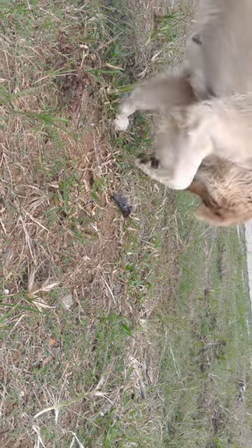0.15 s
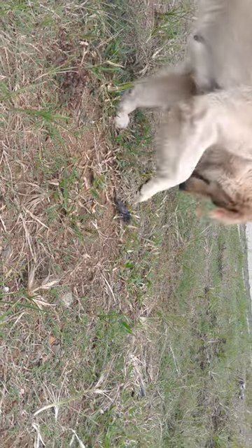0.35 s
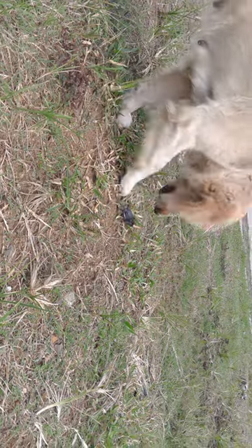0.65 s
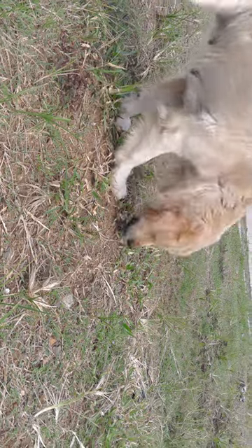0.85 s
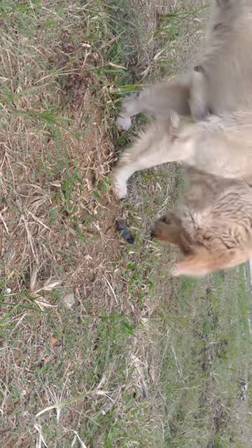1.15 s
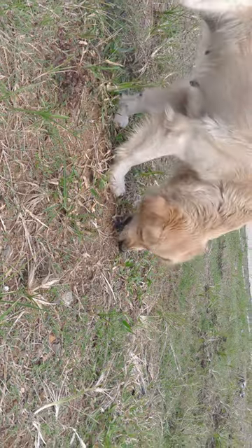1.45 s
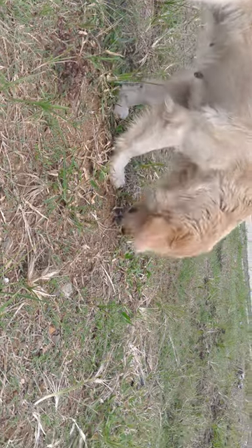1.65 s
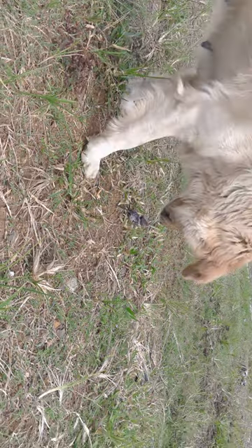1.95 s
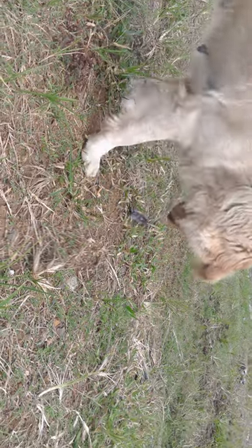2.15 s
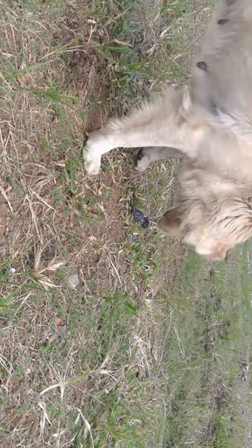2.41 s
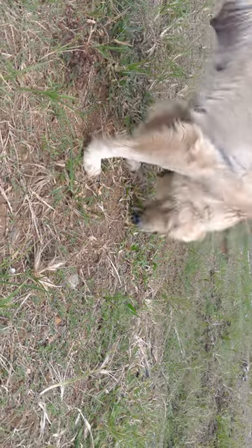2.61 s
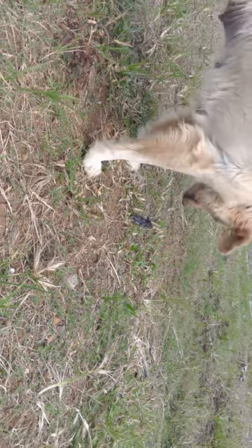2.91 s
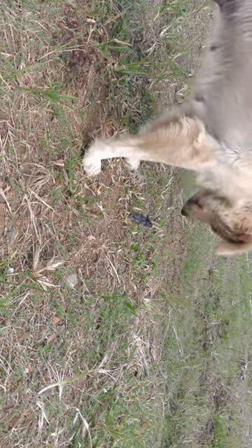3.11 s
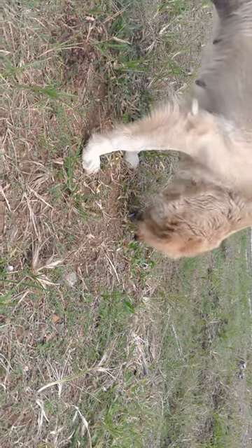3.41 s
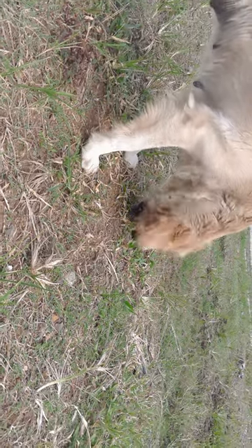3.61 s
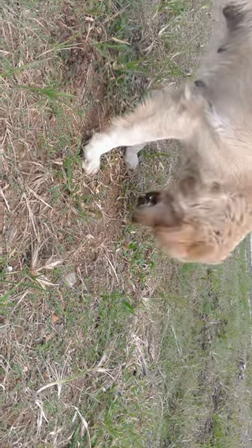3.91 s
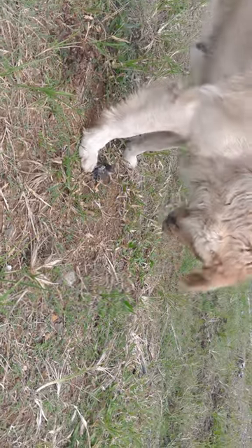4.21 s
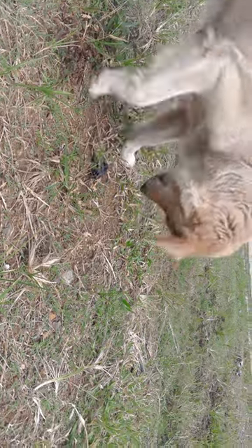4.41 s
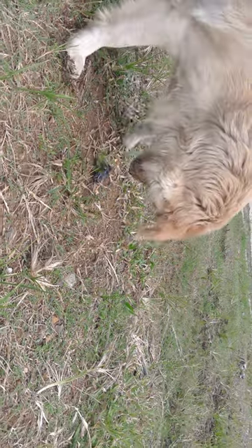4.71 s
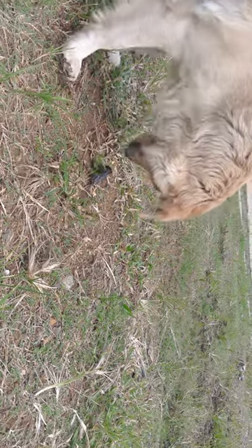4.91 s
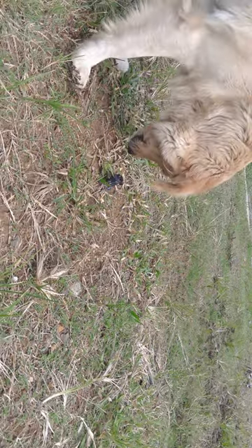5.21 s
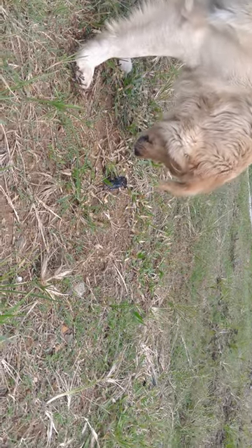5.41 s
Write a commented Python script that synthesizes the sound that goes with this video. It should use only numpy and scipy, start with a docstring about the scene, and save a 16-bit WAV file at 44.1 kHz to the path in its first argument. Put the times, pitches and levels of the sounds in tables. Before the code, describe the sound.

A dog noses a small squeaking rodent in dry grass, its jaws clacking four times, while wind and far traffic rumble softly.

```python
"""Wind and far traffic rumble over an open field while a dog's paws and muzzle stir dry grass, whose stalks tick.
A small rodent then squeaks: near-sine whistles jump in pitch and split into a rougher second tone, with faint gasps.
The dog's jaws snap four times, each a cluster of tooth contacts ringing damped modes, then a rising mouth-cavity ring.
Wind, traffic and rustle are shaped noise; stalks are damped swings with splinters. A phone picks all of it up."""
import sys
import numpy as np
from scipy import signal
from scipy.fft import rfft, irfft
from scipy.io import wavfile
from scipy.ndimage import uniform_filter1d

SR = 44100
rng = np.random.default_rng(int(sys.argv[2]) if len(sys.argv) > 2 else 0)


def voltage_ratio(level):
    """Linear amplitude factor for a level in decibels (scalar or array-like)."""
    return 10 ** (np.asarray(level, float) / 20)


def bounce(signal):
    """Save signal as a 16-bit WAV file at the path given by the first command-line argument."""
    frames = np.transpose(np.atleast_2d(signal))
    limited = np.clip(frames, -1, 1)
    pcm = np.round(limited * 32767).astype(np.int16)
    wavfile.write(sys.argv[1], SR, pcm)


N = 244749


def unit(x):
    """Normalise signal power: scale to an rms of 1."""
    return x / np.sqrt(np.mean(x ** 2))


def curve(rows):
    """Piecewise-linear envelope: join (time [s], value) rows by straight lines."""
    return np.interp(np.arange(N) / SR, *np.transpose(rows))


def colour(x, points):
    """Linear filtering: weight the spectrum by (frequency [Hz], gain [dB]) points, then set rms to 1."""
    hz, db = np.transpose(points)
    f = np.arange(N // 2 + 1) * SR / N + 1
    gain_db = np.interp(np.log(f), np.log(hz), db)
    return unit(irfft(rfft(x) * voltage_ratio(gain_db), N))


def walk(rate):
    """Band-limited random modulation: levels held 1 / rate s and slewed twice, with a spread near 1."""
    hold = int(SR / rate)
    steps = np.repeat(rng.standard_normal(N // hold + 1), hold)
    return 1.75 * uniform_filter1d(uniform_filter1d(steps, hold), hold)[:N]


def add(out, s, x):
    """Superposition: mix x in at time s."""
    i = int(s * SR)
    out[i:i + len(x)] += x[:N - i]


def field():
    """Broadband noise in independently drifting bands for wind and traffic, with resonant engine drones."""
    # long-term noise spectrum: (frequency [Hz], relative density [dB])
    noise_shape = [(15, -4), (30, 1.4), (55, 1.4), (85, -0.5), (140, -1), (200, -5), (310, -11.5),
                   (400, -15.5), (500, -24.5), (800, -29), (1000, -28.5), (2000, -30.5), (3000, -31),
                   (5000, -36), (8000, -43.5)]
    # wind and traffic below 950 Hz: (time [s], gain [dB])
    rumble_gain = [(0, -47.5), (.45, -49), (1.5, -49.5), (3, -48), (5.55, -51.5)]
    # wind buffeting the microphone, below the traffic: (time [s], change [dB])
    gust_gain = [(0, 1), (.4, 7), (1, 1), (1.7, 2.5), (2.1, -3), (2.4, 3), (3, -2.5), (5.55, 1)]
    spectrum = rfft(colour(rng.standard_normal(N), noise_shape))
    f = np.arange(N // 2 + 1) * SR / N

    def band(lo_hz, hi_hz):
        """Spectral windowing: keep one frequency band of the noise."""
        return irfft(spectrum * (f >= lo_hz) * (f < hi_hz), N)

    def narrow(hz, q):
        """Resonance: noise through a sharp peak becomes an unsteady hum."""
        return unit(signal.lfilter(*signal.iirpeak(hz, q, fs=SR), rng.standard_normal(N)))

    rumble = band(0, 90) * voltage_ratio(curve(gust_gain))
    rumble += band(90, 430) * voltage_ratio(0.5 * walk(4.7))
    rumble += band(430, 950) * voltage_ratio(1.2 * walk(7.4))
    # main drone: (time [s], level [dB])
    drone_level = [(0, -55.5), (.5, -52.5), (1.2, -49.5), (2.2, -68.5), (5.55, -61)]
    drone = narrow(157.0, 33) * voltage_ratio(curve(drone_level))
    # fainter engine notes that come and go on the wind, weaker the higher they are
    for hz in (297.2, 366, 415.3, 537, 676.0, 791):
        drone += narrow(hz, 21) * voltage_ratio(-70.5 - 7.2 * np.log2(hz / 300) + 3.3 * walk(6))
    hiss = band(950, SR) * voltage_ratio(-50.5 + walk(4.14))
    return rumble * voltage_ratio(curve(rumble_gain)) + drone + hiss


def stirring():
    """Power summation of independent sources: every move swells and fades over the breeze."""
    # paws and muzzle in the grass; swell and fade each span 20 dB:
    # (loudest time [s], swell [s], fade [s], level [dB])
    moves = [(0, .1, 0.072, -50.5), (.17, 0.1258, 0.227, -68), (0.301, 0.37, 0.047, -50.5),
             (.477, .1, 0.11, -63), (0.945, 0.049, .02, -49), (1.04, 0.17, 0.73, -62),
             (1.835, .03, 0.21, -50.5), (1.878, 0.0702, 0.01693, -68), (1.99, 0.054, 0.964, -54),
             (2.153, 0.028, 0.044, -47), (2.09, 0.09, 0.089, -54), (2.49, 0.1, .5, -67.5),
             (2.723, 0.02597, 0.016, -43.5), (2.763, 0.018, 0.029, -56.5), (2.89, 0.22, 0.2226, -57),
             (4.159, 0.25, 0.24, -60.5), (4.354, .1, 0.093, -60), (4.615, 0.088, 0.031, -53),
             (4.739, .3, 0.088, -62), (4.937, 0.18, 0.16, -57.5), (5.077, 0.018, 0.1749, -53.5),
             (5.19, 0.092, 1, -60), (5.418, 0.32, 0.1003, -61)]
    breeze_db = -71.5  # the grass never falls quite still
    t = np.arange(N) / SR
    power = voltage_ratio(breeze_db) ** 2
    for s, swell, fade, db in moves:
        distance = np.where(t < s, (s - t) / swell, (t - s) / fade)
        power = power + voltage_ratio(db - 20 * distance) ** 2
    return np.sqrt(power)


def grass():
    """Shot noise: dense tiny stalk contacts of uneven size over a hiss, in quick bursts."""
    # spectrum of the rustle: (frequency [Hz], relative density [dB])
    rustle_shape = [(700, -25), (1500, -10), (2800, -16.5), (3800, -7), (5000, -0.4), (6000, -4),
                    (7000, -2.5), (8000, -14.5)]
    contacts_per_s = 2500
    size_db = 3 * np.minimum(rng.exponential(size=N), 3.5)
    hits = (rng.random(N) < contacts_per_s / SR) * voltage_ratio(size_db) * rng.standard_normal(N)
    rub = colour(unit(hits) + 0.99 * rng.standard_normal(N), rustle_shape)
    return rub * stirring() * voltage_ratio(1.4 * walk(80))


def stalks():
    """Damped oscillation: a stalk swings briefly with splinters; bright ones swing a few cycles more."""
    # single stalks that break or flick; gain scales all three parts: (time [s], gain [dB], swing frequency [Hz])
    ticks = [(0.1004, -50.5, 1205), (0.3047, -40, 6190), (0.354, -48, 6600), (0.472, -49.5, 5353),
             (0.8275, -52, 6110), (0.838, -53.5, 6130), (0.909, -49.5, 1120), (1.0215, -34, 7520),
             (1.043, -40.5, 1440), (2.0444, -40, 6500), (2.099, -37, 1370), (2.1472, -35.5, 5050),
             (2.1748, -43.5, 1080), (2.7205, -51, 5100), (2.888, -52, 6300), (3.1206, -56, 6825),
             (3.1303, -55, 6500), (4.068, -49.5, 4600), (4.0887, -45, 5080), (4.1207, -46, 4710),
             (4.1208, -54, 920), (4.1658, -48.5, 4100), (4.259, -50, 4830), (4.2594, -44.5, 670),
             (5.1021, -51, 4970), (5.345, -54, 6700)]
    out, t = np.zeros(N), np.arange(int(0.027 * SR)) / SR
    for s, gain_db, hz in ticks:
        grit = rng.standard_normal(len(t))
        decay_cycles = 0.34 + hz / 1500
        swing = np.sin(2 * np.pi * hz * t) * np.exp(-t * hz / decay_cycles)
        band = signal.butter(2, [hz / 1.17, hz], "band", fs=SR, output="sos")
        splinters = unit(signal.sosfilt(band, grit)) * np.exp(-t / 0.0021)
        # the break itself is a broad, instant crack
        crack = voltage_ratio(-2.0) * grit * np.exp(-t / 0.00029)
        add(out, s, voltage_ratio(gain_db) * (1.85 * swing + voltage_ratio(-2.5) * splinters + crack))
    return out


def whistles(tables, waver, flutter_db, octave_db, rasp_db, rasp_hz, edge_s):
    """Frequency and amplitude modulation: trembling near-sines with an octave and a haze of turbulent breath."""
    out = np.zeros(N)
    pitch = 1 + waver * walk(350)
    strength = voltage_ratio(flutter_db * walk(250))
    lowpass = signal.butter(2, rasp_hz, fs=SR, output="sos")
    breath = voltage_ratio(rasp_db) * unit(signal.sosfilt(lowpass, rng.standard_normal(N)))
    for rows in tables:  # each row: (time [s], frequency [Hz], level [dB])
        s, hz, db = np.transpose(rows)
        i = np.arange(int((s[0] - edge_s) * SR), int((s[-1] + edge_s) * SR))
        t = i / SR
        phase = 2 * np.pi * np.cumsum(np.interp(t, s, hz) * pitch[i]) / SR
        edges = np.clip(np.minimum(t - t[0], t[-1] - t) / (2 * edge_s), 0, 1)
        tone = (1 + breath[i]) * np.sin(phase) + voltage_ratio(octave_db) * np.sin(2 * phase)
        # sqrt(2) turns an rms level into a sine's peak
        out[i] += np.sqrt(2) * voltage_ratio(np.interp(t, s, db)) * edges * strength[i] * tone
    return out


def call(db, change_db, contour):
    """Driven oscillator: a push, a steady drift, more effort on high notes and a dying end."""
    push_s, push_db = 0.0036, 0.5
    dying_s, dying_db = 0.006425, -10.5
    effort_db_per_khz = 3.5  # louder where it is pushed higher
    s0, s1 = contour[0][0], contour[-1][0]
    s = np.linspace(s0, s1, num=200)
    hz = np.interp(s, *np.transpose(contour))
    level = db + change_db * (s - s0) / (s1 - s0)
    level += effort_db_per_khz * (hz - hz.mean()) / 1000
    level += push_db * np.exp((s0 - s) / push_s)
    level += dying_db * np.exp((s - s1) / dying_s)
    return np.transpose([s, hz, level])


def flip(s0, s_flip, s1, low_hz, db):
    """Register change: a tone holds low, then steps up to a weaker register."""
    flip_ratio, flip_db, flip_s = 1.07, -6, .0015
    high_hz, high_db = low_hz * flip_ratio, db + flip_db
    end_s = max(s1, s_flip + 2 * flip_s)
    return [(s0, low_hz, db), (s_flip, low_hz, db), (s_flip + flip_s, high_hz, high_db), (end_s, high_hz, high_db)]


def rodent():
    """Superposed voice registers: the clear whistle, the rough tones that split off it, and gasps."""
    # whistles, before push, effort and dying end:
    # (start level [dB], change by the end [dB], contour of (time [s], frequency [Hz]))
    squeaks = [ (-36.5, -8, [(1.128, 4480), (1.133, 4270), (1.172, 4200), (1.212, 4610), (1.214, 4370),
               (1.228, 4350), (1.235, 4670), (1.274, 4520)]), (-37, -3, [(1.631, 4320), (1.653, 4270),
               (1.675, 4460), (1.679, 4290), (1.726, 4350), (1.746, 4620), (1.754, 4500), (1.77, 4670)]),
               (-61.5, 13, [(1.794, 4480), (1.807, 4530), (1.811, 4270), (1.822, 4150)]),
               (-53, 0, [(1.882, 4230), (1.889, 4550), (1.9, 4480)]), (-49, -2, [(2.258, 4430), (2.3, 4375),
               (2.335, 4430), (2.362, 4300), (2.378, 4250)]), (-43, 3, [(2.879, 4000), (2.893, 4050)]),
               (-43, 1, [(2.922, 4000), (2.925, 4340), (2.937, 4380), (2.95, 4110), (2.956, 4540),
               (2.965, 4550), (2.972, 4417)]), (-62, -6, [(3.766, 3850), (3.79, 3870), (3.815, 4100)]),
               (-61, 2, [(3.822, 3960), (3.838, 4100)]), (-52.5, 8.5, [(4.214, 3700), (4.22, 3940),
               (4.238, 4070)]), (-50.5, 2, [(4.903, 3710), (4.935, 3690), (4.946, 3300)]),
               (-82, 1, [(5.458, 3680), (5.485, 3320), (5.53, 3130)]), ]
    # second tone of the strained voice: (start [s], flip [s], end [s], low frequency [Hz], low level [dB])
    split_tones = [(1.131, 1.137, 1.145, 4930, -46), (1.146, 1.156, 1.168, 4900, -45.5),
                   (1.17, 1.186, 1.195, 5030, -51.5), (1.196, 1.2, 1.203, 5000, -54),
                   (1.654, 1.664, 1.668, 4900, -55), (1.681, 1.682, 1.696, 4980, -46),
                   (1.697, 1.704, 1.716, 5080, -50), (1.719, 1.729, 1.742, 4930, -50),
                   (2.893, 2.906, 2.91, 4800, -47), (2.912, 2.92, 2.923, 5000, -45),
                   (2.893, 2.91, 2.921, 3280, -57), (2.946, 2.953, 2.956, 6150, -50)]
    # faint and hoarse, more breath than tone; level is that of the tone:
    # (start [s], end [s], first frequency [Hz], last frequency [Hz], level [dB])
    gasp_rows = [(1.82, 1.884, 5050, 5300, -67), (2.899, 2.922, 4000, 4200, -64),
                 (2.902, 2.923, 5800, 5600, -68), (3.85, 3.94, 3850, 4030, -77),
                 (3.795, 3.865, 5250, 5450, -77), (3.885, 3.94, 4950, 4900, -77),
                 (3.8, 3.9, 2720, 3400, -82), (2.465, 2.51, 5280, 5370, -77)]
    clear = whistles([call(*row) for row in squeaks], waver=0.005, flutter_db=0.7,
                     octave_db=-13.5, rasp_db=-27.5, rasp_hz=1100, edge_s=.001)
    split = whistles([flip(*row) for row in split_tones], waver=0.009, flutter_db=1.5,
                     octave_db=-43, rasp_db=-9, rasp_hz=900, edge_s=0.001)
    glides = [[(s0, hz0, db), (s1, hz1, db)] for s0, s1, hz0, hz1, db in gasp_rows]
    gasps = whistles(glides, waver=0.014, flutter_db=1.0,
                     octave_db=-38, rasp_db=9, rasp_hz=300, edge_s=0.005)
    return clear + split + gasps


def jaws():
    """Modal synthesis: tooth contacts ring shared modes, most those near their brightest, over a crackle."""
    # tooth contacts, in four clusters; ring peak is before the filters below:
    # (time [s], ring peak [dB], brightest frequency [Hz], ring stretch [ratio])
    contacts = [(1.3245, -38, 3500, .5), (1.3285, -36, 2500, .5), (1.3438, -3, 3900, 1.5),
                (1.3441, -12, 1470, 1.3), (1.3444, -7, 6900, 1.5), (1.348, -20, 2080, 0.8),
                (1.496, -2, 2815, 0.65), (1.498, -19.5, 6500, 1.2), (1.5004, -14, 2518, 1.1),
                (1.625, -4.5, 2540, 0.73), (1.6255, -21, 570, 1.3), (1.6282, -17, 6010, 1.0),
                (1.6285, -12, 2800, 1.0), (1.632, -20.5, 2820, 0.79), (1.7707, -1.5, 2550, 1.0),
                (1.7712, -25, 570, 1.3), (1.7724, 0, 3800, 0.75), (1.7749, -3, 5000, 0.6),
                (1.782, -22, 6800, 1.2)]
    # teeth and mouth: (frequency [Hz], relative level [dB], 60 dB decay time before stretch [s])
    modes = [(570, 2, .022), (1480, -1, .016), (2070, -6, .013), (2480, -1, .014), (2750, -1, .02),
             (3180, -4, .016), (3830, -1, .014), (4630, -3, .012), (5430, 1, .015), (5930, -1, .014),
             (6820, 1, .013), (7390, -5, .013)]
    out, t = np.zeros(N), np.arange(int(0.12 * SR)) / SR
    hz, db, t60 = np.transpose(modes)[:, :, None]
    for s, peak_db, bright_hz, stretch in contacts:
        scatter_db, detune = rng.standard_normal((2, len(modes), 1))
        # a long-ringing contact picks out fewer modes
        octaves_away = abs(np.log2(hz / bright_hz))
        gain = voltage_ratio(db - 13 * stretch * octaves_away + scatter_db)
        # the contact itself spikes above the ring
        fade = np.exp(-np.log(1000) * t / (stretch * t60)) + 0.6 * np.exp(-t / 0.001)
        ring = (gain * fade * np.sin(2 * np.pi * hz * (1 + 0.015 * detune) * t)).sum(axis=0)
        ring = ring / abs(ring).max()
        crackle = np.diff(rng.standard_normal(len(t)), prepend=0) * np.exp(-np.log(1000) * t / 0.021)
        add(out, s, voltage_ratio(peak_db) * (ring + voltage_ratio(-16.0 - 4.3 * stretch) * crackle))
    # the snaps sound little around 1 kHz
    out = signal.lfilter(*signal.iirnotch(1030, 2.2, fs=SR), out)
    # the snaps carry no bass
    return signal.sosfilt(signal.butter(2, 380, "high", fs=SR, output="sos"), out)


def mouth():
    """Cavity resonance: the closing mouth rings higher as it shrinks, fading, with wet treble crackle."""
    # rings after the snaps: (start [s], end [s], first frequency [Hz], last frequency [Hz], start level [dB])
    closings = [(1.351, 1.371, 2650, 3150, -29), (1.504, 1.519, 2650, 3050, -38),
                (1.632, 1.646, 2700, 3200, -33), (1.783, 1.795, 3050, 3300, -33)]
    fade_db = -19  # change over each ring
    t = np.arange(N) / SR
    rings, wet = [], np.zeros(N)
    for s0, s1, hz0, hz1, db in closings:
        middle = ((s0 + s1) / 2, 0.35 * hz0 + 0.68 * hz1, db + fade_db / 2)
        rings.append([(s0, hz0, db), middle, (s1, hz1, db + fade_db)])
        # the crackle begins 3 ms ahead of the ring
        active = (t > s0 - .003) * (t < s1)
        wet += voltage_ratio(db + fade_db * np.clip((t - s0) / (s1 - s0), 0, 1)) * active
    ring = whistles(rings, waver=0.02, flutter_db=4.5, octave_db=-23, rasp_db=-13, rasp_hz=500, edge_s=0.00068)
    treble = signal.butter(1, 3500, "high", fs=SR, output="sos")
    spit = unit(signal.sosfilt(treble, rng.standard_normal(N)))
    return ring + wet * spit * voltage_ratio(-3 + 3.0 * walk(500))


def scene():
    """Free-field superposition: all sources in the open air, with no walls to ring."""
    return (field() + grass() + stalks() + rodent() + jaws() + mouth())[None]


def band_limit(x):
    """A steep low-pass at the top of the band."""
    return signal.sosfilt(signal.butter(12, 8940, fs=SR, output="sos"), x)


def record(dry):
    """Sampling and aliasing: a steep cut under half the phone's rate, and a faint mirror image above."""
    phone_rate_hz = 16000
    lowpass = signal.ellip(7, .3, 48, 7450, fs=SR, output="sos")
    kept = signal.sosfiltfilt(lowpass, dry)
    # multiplying by the rate reflects each frequency f to the rate minus f
    mirrored = kept * np.cos(2 * np.pi * phone_rate_hz * np.arange(N) / SR)
    image_band = signal.butter(3, [8270, 8850], "band", fs=SR, output="sos")
    image = signal.sosfiltfilt(image_band, mirrored)
    return band_limit(kept + voltage_ratio(-13) * image)


dry = scene()
out = record(dry)
bounce(out)
```